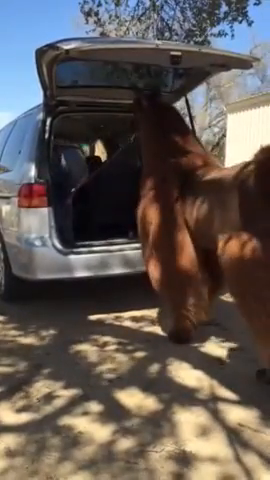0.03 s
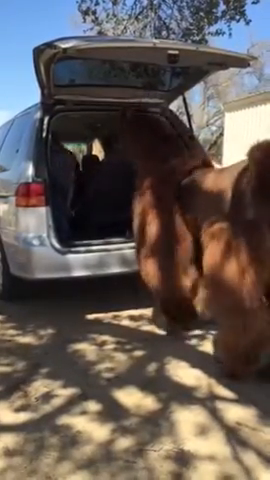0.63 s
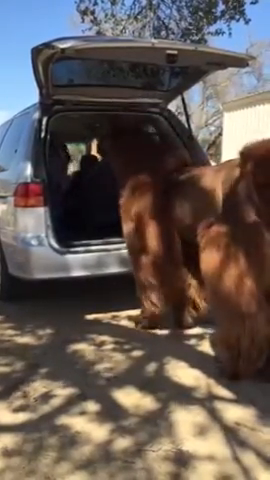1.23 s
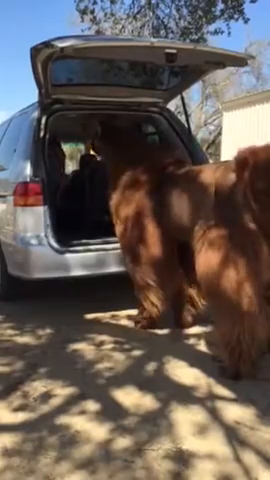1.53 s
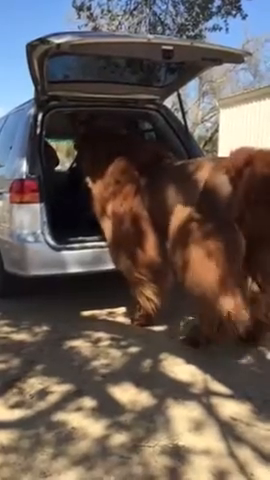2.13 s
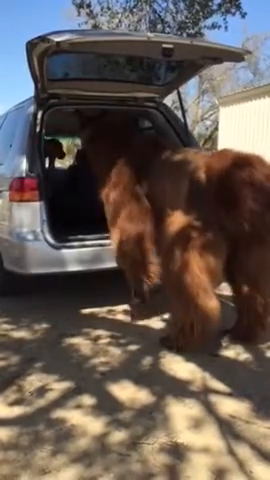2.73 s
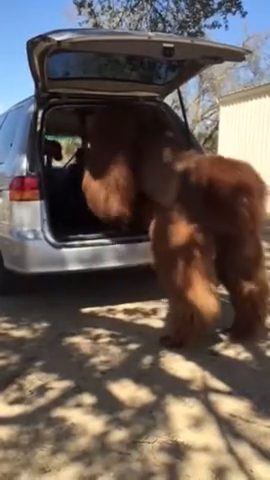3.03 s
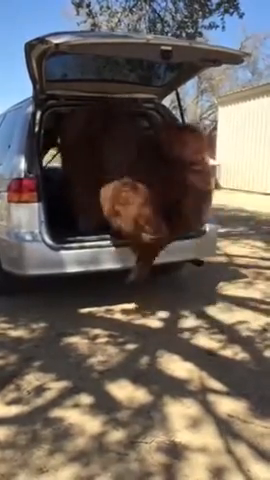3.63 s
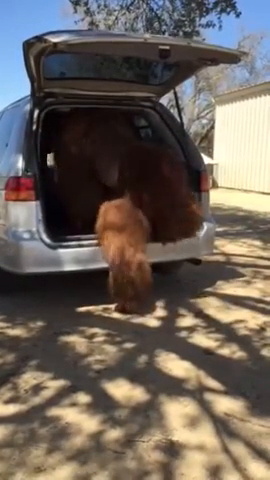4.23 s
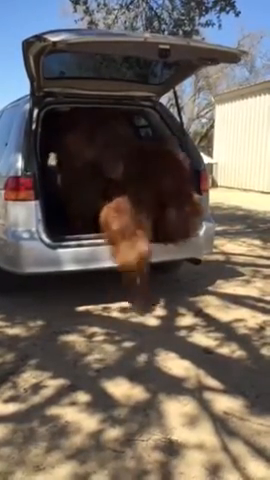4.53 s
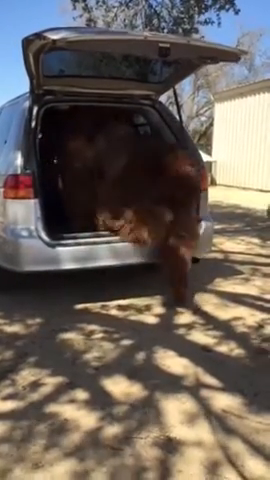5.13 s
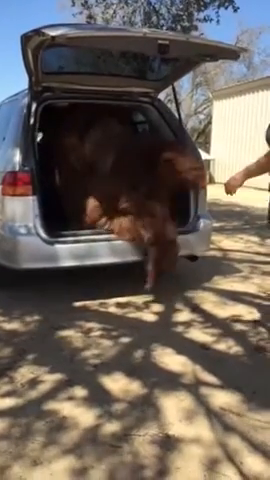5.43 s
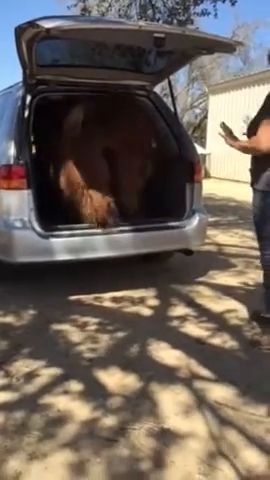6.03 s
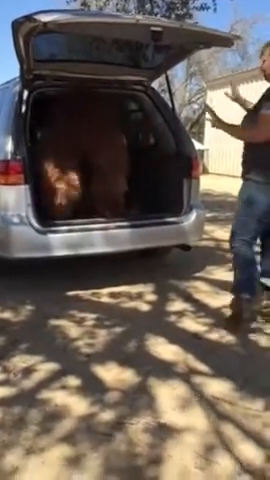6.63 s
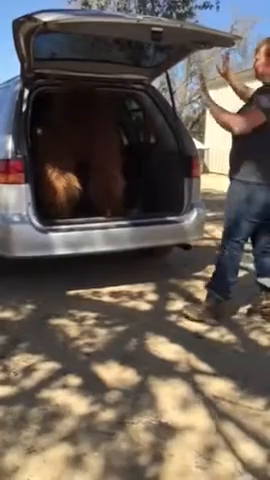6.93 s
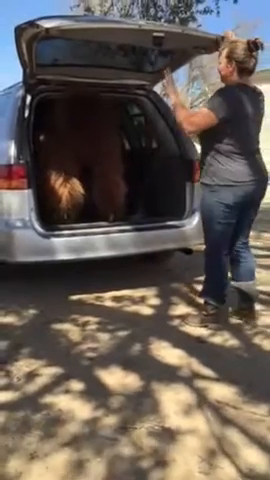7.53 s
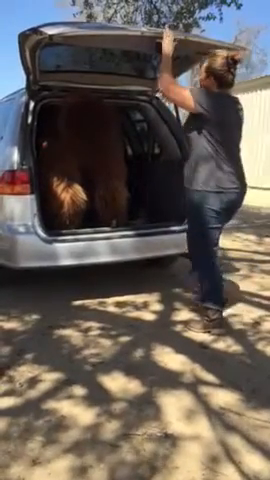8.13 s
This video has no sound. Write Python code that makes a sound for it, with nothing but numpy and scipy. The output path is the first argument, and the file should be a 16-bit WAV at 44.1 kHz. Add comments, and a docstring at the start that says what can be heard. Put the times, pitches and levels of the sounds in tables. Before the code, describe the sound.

Wind buffets the microphone as a llama's feet knock into an idling van, with faint scuffs on dirt.

```python
"""A dirt yard, where a llama clambers into the back of an idling van.
Its feet scuff the grit, then knock on the bumper and cargo floor: each impact clatters the trim and
excites the damped modes of shell and floor. Shoes shuffle up behind it. Throughout, gusts carry eddies
past the microphone, whose port turns their pressure swings into rumble, patter and pops. Behind them
the van hums, and its fan and belts whirr and hiss through the resonances of the engine bay."""
import sys
import numpy as np
from scipy import signal
from scipy.fft import rfft, irfft, next_fast_len
from scipy.io import wavfile
from scipy.ndimage import uniform_filter1d, map_coordinates

SR = 44100
rng = np.random.default_rng(int(sys.argv[2]) if len(sys.argv) > 2 else 0)


def master_out(mix):
    """Clip the mix to full scale and print it as 16-bit PCM to the path in sys.argv[1]."""
    frames = np.transpose(np.atleast_2d(mix))
    ceiling = np.clip(frames, -1, 1)
    pcm = np.round(ceiling * 32767).astype(np.int16)
    wavfile.write(sys.argv[1], SR, pcm)


N = 369116
CUTOFF_HZ = 15300

# the idling van as the microphone moves: (time [s], whirr level [dB], hiss level [dB])
IDLE_LEVELS = [(0, -51.5, -62.5), (0.4, -54, -65.5), (1.0, -52.5, -63.5), (2.24, -53.5, -62.5),
               (3.2, -55, -68.5), (3.9, -54, -62), (4.45, -55, -65.5), (5.6, -53, -63.5), (5.97, -51, -60),
               (6.7, -51, -59), (7.55, -53, -61), (8.37, -52.5, -60.5)]
# whirr and hiss of the fan and belts, each: (frequency [Hz], relative spectral density [dB])
WHIRR_SPECTRUM = [(200, 6.5), (380, 0), (460, -2.5), (600, 1.5), (800, 1.5), (1050, -2.5), (1600, -8),
                  (2300, -8.5), (3000, -19), (5000, -34)]
HISS_SPECTRUM = [(1500, -1), (3000, 4.5), (4300, 3), (5000, -2.5), (7000, -7), (9500, -12), (10500, -15.5),
                 (15000, -16)]
# resonances of the engine bay: (frequency [Hz], width [Hz], boost [dB])
BAY_RESONANCES = [(801, 63, 5), (1157, 45, 7), (1480, 79, 9.5), (1906, 400, 5), (2630, 61, 5),
                  (3200, 79, 5.5), (3910, 220, 5), (4410, 140, 8.5), (5630, 590, 10.5), (8700, 520, 8)]
# strength of those resonances as the microphone turns: (time [s], level over the plain sound [dB])
BAY_PROMINENCE = [(0, -10), (5.5, -6), (6.1, -1), (7.1, 5), (7.6, 2), (8.37, -3)]
# partials of the van's hum: (frequency [Hz], relative level [dB])
HUM_PARTIALS = [(146, -50.5), (195, -51), (238, -55.5), (288, -57), (392, -57.5), (587, -69.5)]
# two hollow bands of the whirr that swell by turns: (time [s], low band [dB], high band [dB])
WHIRR_BAND_LEVELS = [(0, -67, -63), (1.4, -76, -70), (1.85, -54.5, -76), (2.3, -66.5, -60),
                     (3.5, -71.5, -69.5), (5.6, -70, -68), (6.0, -67, -58), (6.55, -50, -61),
                     (7.0, -60, -55.5), (7.5, -60.5, -66), (8.37, -63, -61)]

# gusts at the microphone: (start [s], length [s], relative rumble level [dB], relative eddy level [dB])
GUST_EVENTS = [(0.133, 0.058, -32.5, -58), (0.209, 0.29, -28, -52), (0.56, 0.11, -31, -46),
               (0.85, 0.18, -39, -66), (1.153, 0.2, -34, -50.5), (1.429, 0.043, -25, -45),
               (1.892, 0.11, -38, -51.5), (2.087, 0.15, -33.5, -49.5), (2.358, 0.27, -27, -38.5),
               (2.654, 0.37, -27, -33.5), (3.052, 0.19, -24, -32), (3.25, 0.19, -35, -60.5),
               (3.405, 0.081, -22, -37), (3.545, 0.073, -23.5, -55), (3.704, 0.38, -26.5, -38),
               (3.944, 0.21, -25, -40), (4.197, 0.22, -25.5, -36), (4.56, 0.16, -29, -45),
               (4.761, 0.27, -23.5, -37), (5.082, 0.18, -29, -51), (5.45, 0.18, -37.5, -68),
               (6.09, 0.026, -32, -37), (6.77, 0.1, -37, -67), (6.988, 0.75, -35, -61),
               (7.211, 0.13, -30.5, -43.5), (7.638, 0.26, -32.5, -46), (7.999, 0.048, -31.5, -46),
               (8.155, 0.02, -36, -54)]
GUST_RISE_S, GUST_FALL_S = 0.014, 0.029   # linear rise, time constant of the fall
BREEZE_RUMBLE_DB, BREEZE_EDDY_DB = -41.5, -59.5   # light air between gusts
# rumble of the large eddies: (frequency [Hz], relative spectral density [dB])
RUMBLE_SPECTRUM = [(20, -17), (32, -30.5), (48, 2), (75, 1.5), (110, -2.5), (170, -12), (250, -21),
                   (400, -32), (800, -64.5)]

# feet, shoes and wool brushing grit and trim:
# (time of peak [s], relative level [dB], length [s], tilt [dB/octave])
SCUFF_EVENTS = [(0.17, -64, 0.034, 4), (0.199, -58.5, 0.0074, 9), (0.309, -65.5, 0.021, 14),
                (0.552, -54.5, 0.016, 1.5), (0.58, -57, 0.033, -1), (0.927, -53, 0.027, -0.5),
                (1.57, -59.5, 0.034, -1), (1.852, -59.5, 0.037, -2.5), (2.344, -56, 0.015, 3),
                (2.597, -52.5, 0.025, -6.5), (2.842, -59.5, 0.012, -0.5), (2.949, -64.5, 0.024, 3),
                (3.106, -68, .005, 7), (3.562, -69, 0.025, 5), (4.138, -71, 0.035, 12),
                (4.531, -56, 0.0075, 7), (4.587, -59.5, 0.09, 0), (4.797, -38, 0.0045, -0.5),
                (4.803, -45.5, 0.032, -2), (4.942, -42, 0.0035, 3), (5.125, -58.5, 0.028, 8),
                (5.859, -58, 0.01, 1.5), (6.117, -54.5, 0.031, -2.5), (6.397, -60, 0.015, 0.5),
                (6.995, -55.5, 0.022, -1.5), (7.118, -61, 0.055, -1), (7.58, -53, 0.006, 1),
                (7.603, -52.5, 0.01, 4.5), (7.614, -48, 0.024, -4.5)]
# crunch of the grit: (frequency [Hz], relative spectral density [dB])
GRIT_SPECTRUM = [(400, -13), (900, 4), (2000, 1), (4000, -6.5), (8000, -12.5), (15000, -21)]
# strong eddies that pop on the microphone port: (time [s], relative level [dB], pitch [Hz])
STRONG_EDDIES = [(0.227, -16.5, 213), (0.284, -18.5, 115), (0.367, -13, 85), (0.389, -13.5, 89.5),
                 (0.473, -16.5, 115), (0.62, -23.5, 214), (0.652, -16, 181), (1.166, -22, 115),
                 (1.316, -23, 91), (1.429, -13.5, 122), (1.464, -17, 115), (1.913, -13.5, 159),
                 (2.383, -11, 110), (2.412, -13.5, 255), (2.465, -12.5, 79), (2.493, -10.5, 153),
                 (2.553, -13.5, 172), (2.624, -13.5, 251), (2.714, -14.5, 335), (2.722, -9, 260),
                 (2.732, -14, 295), (2.788, -14, 273), (2.812, -16.5, 300), (2.865, -17, 416),
                 (2.91, -26, 318), (2.923, -14.5, 446), (2.941, -11.5, 312), (2.949, -18, 295),
                 (2.995, -10.5, 161), (3.009, -18, 345), (3.033, -13.5, 340), (3.084, -14, 295),
                 (3.113, -11, 85), (3.133, -10, 260), (3.163, -15, 325), (3.226, -13, 198),
                 (3.391, -20.5, 305), (3.394, -8, 75.4), (3.436, -9.5, 290), (3.946, -9.5, 104),
                 (3.983, -13, 255), (4.077, -21.5, 265), (4.224, -26, 288), (4.244, -11.5, 297),
                 (4.29, -20, 245), (4.349, -10, 84), (4.379, -16, 357), (4.409, -14, 316),
                 (4.439, -16, 116), (4.63, -17, 163.6), (4.712, -10, 68), (4.769, -11.5, 100),
                 (4.829, -10, 213), (4.913, -12.5, 175), (4.993, -5.5, 300), (5.024, -15, 181),
                 (5.106, -13.5, 59), (5.19, -20, 367), (5.2, -17, 69), (5.264, -19, 175),
                 (6.121, -23.5, 99), (7.245, -18.5, 118), (7.635, -8.5, 205), (7.681, -7.5, 176),
                 (7.79, -22.5, 215), (7.839, -21, 259), (7.857, -15, 68.4)]

# feet on the bumper and sill: (time [s], clack level [dB], relative thud level [dB], thud pitch [Hz],
# tilt [dB/octave], rise [s], T60 [s], resonance of the struck spot [Hz], its boost [dB],
# relative level of the shell's ring [dB])
FOOTFALLS = [(2.185, -33, -32.5, 256, -2.5, 0.0021, 0.079, 1960, 7, -10),
             (2.2167, -25, -34, 256, -2.5, 0.00073, 0.073, 3700, 12, -14),
             (2.227, -31.5, -44, 256, -4.5, 0.00069, 0.39, 1500, 4, -17),
             (3.7226, -18.5, -18, 276, 3.7, 0.0016, 0.033, 3300, 4, -7),
             (3.727, -12, -7.5, 291, -1, 0.00045, 0.055, 2360, 3, -8),
             (3.821, -44.5, -39, 290, 2.5, 0.0033, 0.073, 3400, -5, -18),
             (4.797, -16, -11, 282, -0.2, 0.0029, 0.05, 1260, 10, -6.5),
             (4.89, -35.5, -28, 256, 1.5, 0.0042, 0.09, 4500, -1, -18),
             (4.941, -21.5, -17, 258, -1, 0.0043, 0.11, 760, 8, -5),
             (5.3845, -23.5, -37, 250, -1.5, 0.0011, 0.17, 1600, -2, -13),
             (5.3878, -5, -2, 263.4, 1, 0.0019, 0.013, 1430, 12, -21),
             (5.3999, -13.5, -11.5, 222.5, -1, 0.002, 0.054, 1900, 0, -8),
             (5.471, -24.5, -31, 254, -1.5, 0.0003, 0.05, 2800, 3, -14),
             (5.484, -19.5, -13.5, 255, -4.5, 0.0018, 0.11, 2200, -7, -13)]
# clatter of the plastic trim: (frequency [Hz], relative spectral density [dB])
TRIM_SPECTRUM = [(200, 5.5), (450, 1), (720, 1.5), (1100, -2), (1450, -3.5), (1800, -6.5), (2300, -4),
                 (3400, -10), (4300, -13), (7000, -17), (9700, -20), (11000, -23.5), (15000, -28.5)]
# mode clusters of the plastic bumper shell: (frequency [Hz], relative level [dB], T60 [s])
SHELL_MODES = [(648, -2, 0.19), (771, -4.5, 0.27), (928, -2.5, 0.16), (1080, -7, 0.07), (1480, -18, 0.11),
               (1877, -5.5, 0.1), (2228, -2, 0.075), (2514, -15, 0.08), (2810, -25, 0.044),
               (3310, -5, 0.052)]
# modes of the cargo floor: (frequency over thud pitch [ratio], relative level [dB], T60 [s])
FLOOR_MODES = [(0.336, -7, 0.44), (0.47, -11, 0.29), (0.68, 1.5, 0.17), (1.0, 2, 0.12), (1.17, -5, 0.056)]


def from_db(db):
    """Decibels to amplitude ratio."""
    return 10 ** (np.asarray(db) / 20)


def unit_rms(x):
    """Normalise to rms 1."""
    return x / np.sqrt(np.mean(x ** 2) + 1e-20)


def curves(rows):
    """Linear interpolation of each level column at every sample."""
    times, *columns = np.transpose(rows)
    return [np.interp(np.arange(N) / SR, times, column) for column in columns]


def add(out, start_s, sound):
    """Superposition: a sound adds to the mix from its start time."""
    start = round(start_s * SR)
    sound, start = sound[max(-start, 0):], max(start, 0)
    out[start:start + len(sound)] += sound[:max(len(out) - start, 0)]


def noise(spectrum, size, tilt_db=0, peaks=(), grain_db=0):
    """Spectral shaping: noise of rms 1 with a tilt per octave and resonances; grain_db adds crackle."""
    padded = next_fast_len(size)
    hz = np.maximum(np.fft.rfftfreq(padded, 1 / SR), 1)
    points, levels = np.transpose(spectrum)
    db = np.interp(np.log(hz), np.log(points), levels) + tilt_db * np.log2(np.minimum(hz, CUTOFF_HZ))
    for centre, width, peak_db in peaks:
        db = db + peak_db / (1 + (2 * (hz - centre) / width) ** 2)
    band_edges = 1 / (1 + (points[0] / hz / 2) ** 4) / (1 + (hz / points[-1] / 2) ** 4)
    grains = rng.standard_normal(padded) * from_db(grain_db * np.minimum(rng.exponential(1, padded), 4))
    return unit_rms(irfft(rfft(grains) * from_db(db) * band_edges, padded)[:size])


def drift(rate_hz, size):
    """Random modulation: a smooth curve through rate_hz normal draws a second."""
    steps = np.arange(size) / SR * rate_hz
    draws = rng.standard_normal(2 ** 12 if size < SR else 2 ** 15)
    return map_coordinates(draws, [steps + 2], order=2, mode="wrap")


def narrow_band(hz, width_hz, size):
    """Random quadrature modulation spreads a steady or moving tone into a noise band of rms 1."""
    phase = 2 * np.pi * np.cumsum(hz * np.ones(size)) / SR
    return unit_rms(drift(width_hz, size) * np.cos(phase) + drift(width_hz, size) * np.sin(phase))


def high_pass(x, hz):
    """Second-order bass cut."""
    return signal.sosfilt(signal.butter(2, hz, "high", fs=SR, output="sos"), x)


def reflections(x, level_db, spread_s, count=10):
    """Interference: short echoes from ground, panels and shed wall ripple the spectrum at equal power."""
    out, gain = x.copy(), from_db(level_db)
    for delay, sign in zip(spread_s * rng.uniform(0.1033, 1, count), rng.choice([-1, 1], count)):
        add(out, delay, sign * gain * x)
    return out / np.sqrt(1 + count * gain ** 2)


def fan_and_belts(resonances, flutter_db):
    """Broadband machine noise: a whirr and a fluttering hiss, filtered by any resonances given."""
    whirr_db, hiss_db = curves(IDLE_LEVELS)
    whirr = from_db(whirr_db + 4.5) * noise(WHIRR_SPECTRUM, N, peaks=resonances)
    hiss_gain = from_db(hiss_db + 0.5 + flutter_db * drift(30, N))
    return whirr + hiss_gain * noise(HISS_SPECTRUM, N, peaks=resonances)


def idling_van(hum_db=-1.5, waver_db=2.5, wander=0.0042, flutter_db=2.16):
    """Cavity resonance: the engine bay colours part of the fan and belt noise, over a wavering hum."""
    bay_gain = from_db(curves(BAY_PROMINENCE)[0] + 2 * flutter_db * drift(8.2, N))
    plain = fan_and_belts((), flutter_db)
    hollow = fan_and_belts(BAY_RESONANCES, flutter_db)
    blend = (plain + bay_gain * hollow) / np.hypot(1, bay_gain)
    air = reflections(blend, level_db=-20.0, spread_s=0.02)
    engine_time = np.cumsum(1 + wander * drift(6, N)) / SR   # all partials wander in pitch together
    hum = 0
    for hz, db in HUM_PARTIALS:
        gain = from_db(db + waver_db * drift(4.3, N))
        hum += gain * np.sin(2 * np.pi * (hz * engine_time + rng.random()))
    return air + from_db(hum_db) * np.sqrt(2) * hum


def whirr_swells(centres_hz=(785, 2020), widths_hz=(120, 280), wander=0.025):
    """Amplitude modulation: two narrow bands of the whirr swell and sink, their centres wandering."""
    return sum(from_db(db) * narrow_band(hz * (1 + wander * drift(3, N)), width, N)
               for db, hz, width in zip(curves(WHIRR_BAND_LEVELS), centres_hz, widths_hz))


def gust_levels():
    """Incoherent sources add in power: rumble and eddy levels, in dB, of gusts on top of the breeze."""
    t = np.arange(N) / SR
    rumble_power = np.full(N, from_db(BREEZE_RUMBLE_DB) ** 2)
    eddy_power = np.full(N, from_db(BREEZE_EDDY_DB) ** 2)
    for start, length, rumble_db, eddy_db in GUST_EVENTS:
        age = t[:round((length + 10 * GUST_FALL_S) * SR)]
        swell = np.minimum(age / GUST_RISE_S, 1) * np.exp(-np.maximum(age - length, 0) / GUST_FALL_S)
        add(rumble_power, start, (from_db(rumble_db) * swell) ** 2)
        add(eddy_power, start, (from_db(eddy_db) * swell) ** 2)
    return 10 * np.log10(rumble_power), 10 * np.log10(eddy_power)


def add_eddy(out, time_s, height, hz):
    """Convection: a vortex core passing the port gives a pressure swing, briefer if small and fast."""
    half = SR // 50
    position = np.pi * hz * np.arange(-half, half) / SR
    swing = position / (1 + position ** 2) ** 3 * np.hanning(2 * half)
    add(out, time_s - half / SR, height * swing / swing.max())


def wind(eddies_per_s=380, eddy_hz=166, finest_hz=640, size_spread=0.59, port_hz=130, flutter_db=2.5):
    """Turbulence: large eddies rumble; small ones patter in flurries, finer as the gust grows."""
    rumble_db, eddy_db = gust_levels()
    rumble = noise(RUMBLE_SPECTRUM, N)
    rumble /= np.sqrt(uniform_filter1d(rumble ** 2, size=SR // 14))   # evened out; gusts set the level
    eddies = np.zeros(N)
    strength, fineness = rng.standard_normal((2, N))
    for i in np.flatnonzero(rng.random(N) < eddies_per_s / SR):
        hz = eddy_hz * np.exp(0.02 * (eddy_db[i] + 35) + size_spread * fineness[i])
        hz = finest_hz * np.tanh(hz / finest_hz)
        height = from_db(2.5 * strength[i]) * eddy_hz / hz   # smaller eddies carry less pressure
        add_eddy(eddies, i / SR, height, hz)
    eddies = high_pass(eddies, port_hz)
    eddies /= np.sqrt(uniform_filter1d(eddies ** 2, size=SR // 8) + 1e-9)
    flurry_db = flutter_db * drift(45, N)
    return from_db(rumble_db + 2.5 + flurry_db / 2) * rumble + from_db(eddy_db + 9 + flurry_db) * eddies


def scuffs(grain_db=7.0, clump_db=3.0, gain_db=4.5):
    """Granular friction: each short crunch swells and fades, its grains breaking loose in clumps."""
    out, t = np.zeros(N), np.arange(-SR // 4, SR // 4) / SR
    for time_s, db, length, tilt_db in SCUFF_EVENTS:
        clumps = unit_rms(from_db(clump_db * drift(261.5, len(t))))
        swell = 1 / np.cosh(np.clip(1.8 * t / length, -20, 20))
        grit = noise(GRIT_SPECTRUM, len(t), tilt_db, grain_db=grain_db)
        add(out, time_s + t[0], from_db(db + gain_db) * swell * clumps * grit)
    return out


def buffets(gain_db=-3.5, wake_db=-13.0, wake_spread_s=0.00404, wake_count=2, dispersion_hz=260):
    """Dispersion: strong eddies pop amid weaker ones; the lows arrive late, so each pop falls in pitch."""
    pops = np.zeros(N)
    for time_s, db, hz in STRONG_EDDIES:
        add_eddy(pops, time_s, from_db(db + gain_db), hz)
        for lag, sign in zip(rng.normal(0, wake_spread_s, wake_count), rng.choice([-1, 1], wake_count)):
            add_eddy(pops, time_s + lag, sign * from_db(db + gain_db + wake_db), hz * 1.02)
    pole = np.exp(-2 * np.pi * dispersion_hz / SR)
    dispersed = signal.lfilter([pole, -1], [1, -pole], pops)   # all-pass
    return microphone_port(dispersed)


def microphone_port(pressure, hz=98, q=1.26):
    """Damped resonance: the port cuts the bass and rings briefly after every pressure swing."""
    w = 2 * np.tan(np.pi * hz / SR)
    return signal.lfilter(*signal.bilinear([1, 0, 0], [1, w / q, w * w]), pressure)


def knocks(cabin_db=-22, cabin_t60=0.3, rattle_db=1.0, shell_gain_db=-6.0, floor_gain_db=-5.0):
    """Impact excitation: each footfall sets trim, bumper and floor sounding and dies away in the cabin."""
    out, t = np.zeros(N), np.arange(SR // 2) / SR
    for time_s, clack_db, thud_db, thud_hz, tilt_db, rise, t60, spot_hz, spot_db, shell_db in FOOTFALLS:
        attack = np.minimum(t / rise, 1)
        decay = from_db(-60 * t / t60) + from_db(cabin_db - 60 * t / cabin_t60)
        rattle = from_db(rattle_db * drift(600, len(t)))
        struck_spot = (spot_hz, 0.51 * spot_hz, spot_db)
        trim = noise(TRIM_SPECTRUM, len(t), tilt_db, peaks=[struck_spot], grain_db=6.0)
        clack = reflections(trim * attack * decay * rattle, level_db=-23.5, spread_s=0.018)
        clack += from_db(shell_db + shell_gain_db) * bumper_ring(t) * attack
        thud = from_db(thud_db + floor_gain_db) * floor_boom(t, thud_hz)
        add(out, time_s, from_db(clack_db) * clack + thud)
    return out


def bumper_ring(t, relative_width=0.11):
    """Modal overlap: a hard toenail rings clusters of close shell modes, hollow but of no clear pitch."""
    return sum(from_db(db - 60 * t / t60) * narrow_band(hz, relative_width * hz, len(t))
               for hz, db, t60 in SHELL_MODES)


def floor_boom(t, pitch_hz, build_cycles=0.5, detune=0.042):
    """Normal modes: a soft foot pad swings the floor; the load detunes each mode; low ones ring longest."""
    boom = 0
    for (ratio, db, t60), shift in zip(FLOOR_MODES, rng.standard_normal(len(FLOOR_MODES))):
        cycles = pitch_hz * ratio * (1 + detune * shift) * t
        build = 1 - np.exp(-(cycles / build_cycles) ** 2)
        boom += from_db(db - 60 * t / t60) * build * np.sin(2 * np.pi * cycles)
    return boom


def scene():
    """Superposition: the pressures of all sources add at one microphone."""
    return (wind() + buffets() + knocks() + scuffs() + idling_van() + whirr_swells())[None]


def record(dry, bass_cut_hz=29, dip_hz=470, dip_db=-3.0, dip_q=2.54, ceiling=0.7):
    """Filtering and saturation: the microphone cuts both extremes, dips the low middle, rounds peaks."""
    low_middle = signal.lfilter(*signal.iirpeak(dip_hz, dip_q, fs=SR), dry)
    coloured = high_pass(dry - (1 - from_db(dip_db)) * low_middle, bass_cut_hz)
    rounded = coloured / (1 + (coloured / ceiling) ** 4) ** 0.25
    low_pass = signal.ellip(10, 0.1, 80, CUTOFF_HZ, fs=SR, output="sos")
    return signal.sosfilt(low_pass, rounded)


dry = scene()
out = record(dry)
master_out(out)
```